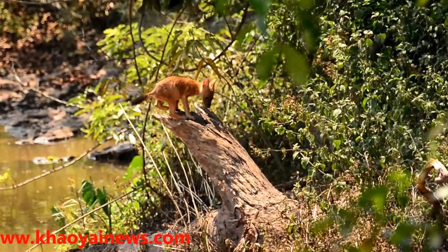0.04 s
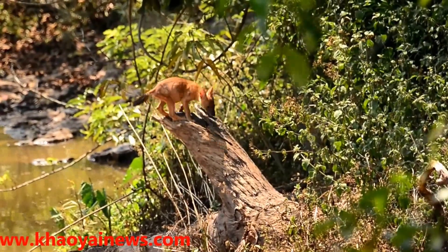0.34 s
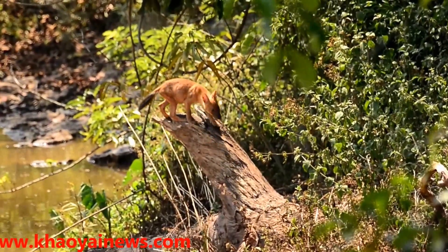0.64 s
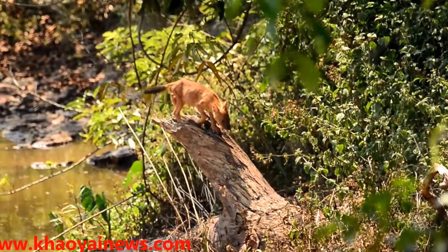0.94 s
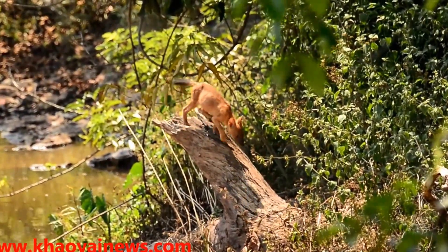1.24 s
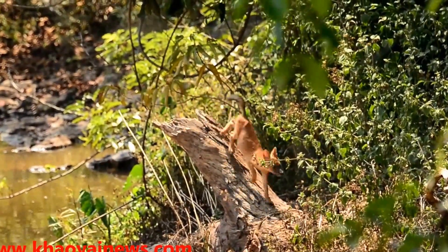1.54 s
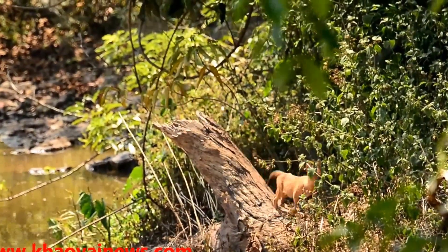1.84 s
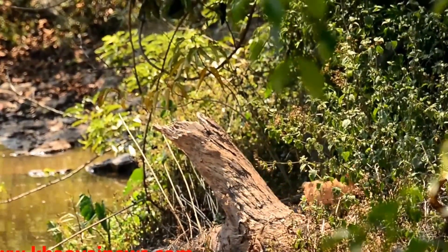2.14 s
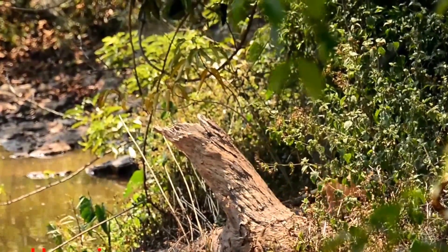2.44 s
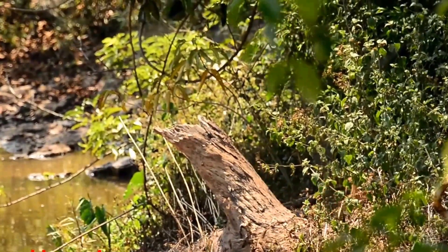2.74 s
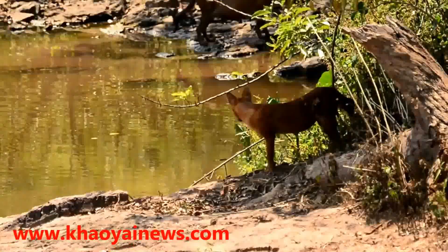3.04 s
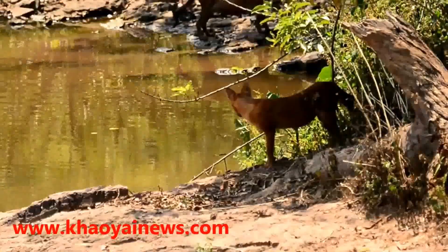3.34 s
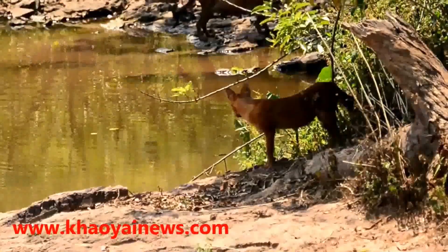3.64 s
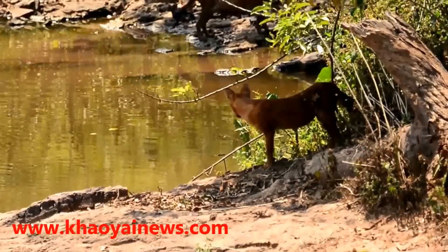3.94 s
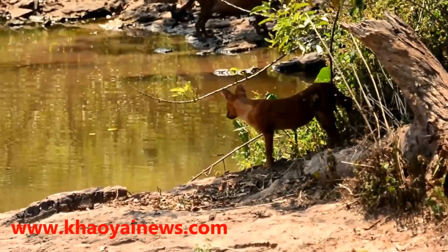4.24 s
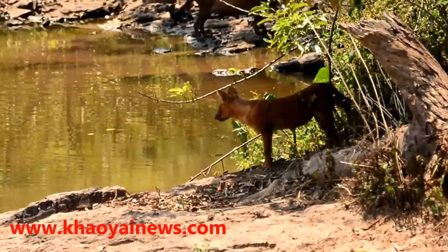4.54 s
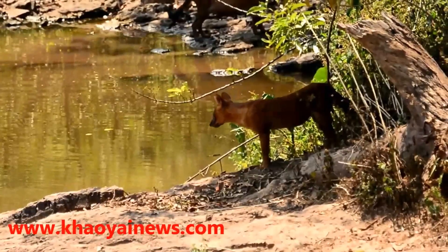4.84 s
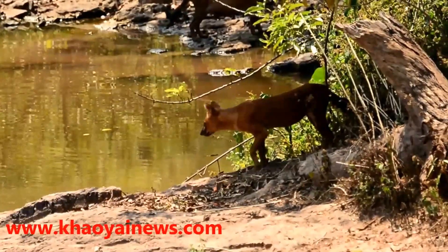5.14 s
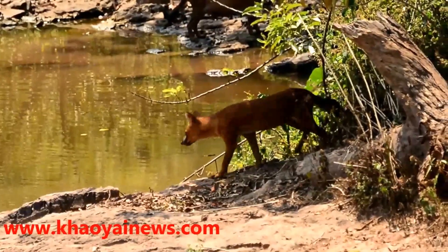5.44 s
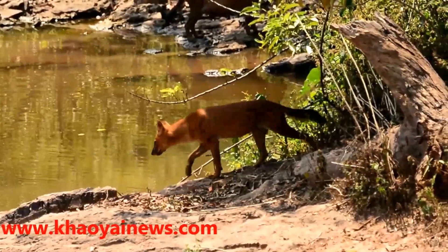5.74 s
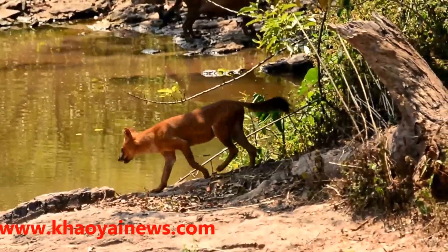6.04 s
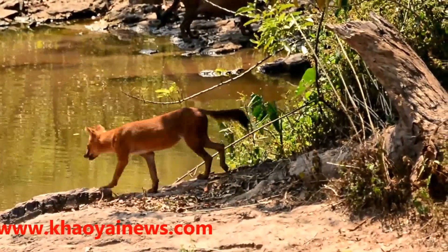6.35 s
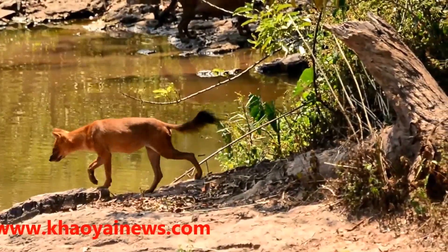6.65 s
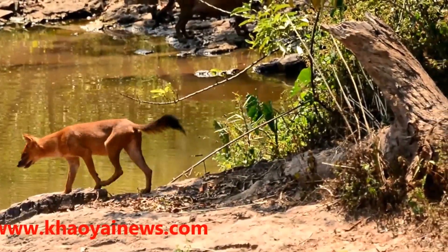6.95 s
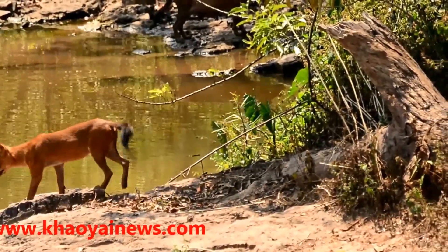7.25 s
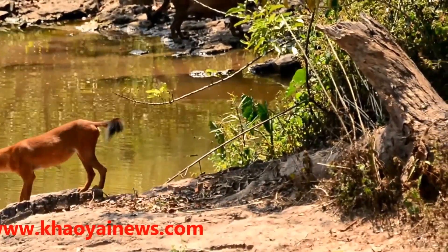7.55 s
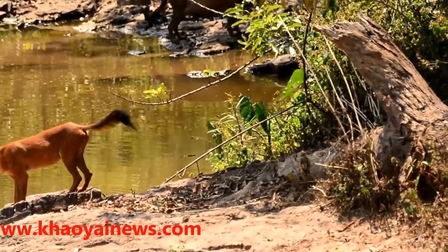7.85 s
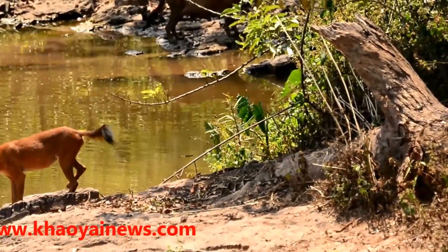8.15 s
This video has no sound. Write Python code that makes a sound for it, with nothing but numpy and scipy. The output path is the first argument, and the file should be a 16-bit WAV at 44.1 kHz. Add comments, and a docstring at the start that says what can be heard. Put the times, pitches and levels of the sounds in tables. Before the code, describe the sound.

Cicadas hiss far off in a forest with thin bird whistles, then swell much louder over a low hum as twigs snap.

```python
"""Cicadas in the heat at a forest waterhole, countless tymbal clicks merging into a hiss, in two shots.
In the first the chorus is far off; a whistling bird and a thin high one sing nearer the microphone,
a warbler calls in the distance and wood is knocked twice. After a cut a much louder chorus fades in
with a low mains hum: twigs snap on the bank, a far bird rasps, and the handled camera rumbles and rings.
A few dull thuds fall close by. Birds, knocks and twigs echo off trunks and leaves."""
import sys
import numpy as np
from scipy import signal
from scipy.fft import rfft, irfft
from scipy.io import wavfile

SR = 44100
rng = np.random.default_rng(int(sys.argv[2]) if len(sys.argv) > 2 else 0)


def master_out(mix):
    """Clip the mix to full scale and print it as 16-bit PCM to the path in sys.argv[1]."""
    frames = np.transpose(np.atleast_2d(mix))
    ceiling = np.clip(frames, -1, 1)
    pcm = np.round(ceiling * 32767).astype(np.int16)
    wavfile.write(sys.argv[1], SR, pcm)


N = 365588
TIME = np.arange(N) / SR
HZ = np.maximum(np.fft.rfftfreq(N, 1 / SR), 1)
CUT_S = 3.059

# arched note of both distant birds: the arguments of contour()
ARCHED_NOTE = dict(top=.55, start=.8, end=0.95, start_db=-2, end_db=-1.5, bend=1.304)


def from_db(db):
    return 10 ** (np.asarray(db) / 20)


def unit_rms(x):
    return x / np.sqrt(np.mean(x ** 2) + 1e-20)


def at_hz(points):
    """A table read on a log-frequency axis."""
    hz, value = np.transpose(points)
    return np.interp(np.log(HZ), np.log(hz), value)


def drift(rate_hz):
    """A random wander with rms 1, mostly slower than rate_hz."""
    return unit_rms(irfft(rfft(rng.standard_normal(N)) / (1 + (HZ / rate_hz) ** 2), N))


def add(track, start_s, sound):
    start = max(round(start_s * SR), 0)
    track[start:start + len(sound)] += sound[:N - start]


def wash(spectrum, likeness):
    """Stereo noise from countless small sources, falling off beyond the ends of its spectrum."""
    mid, side = rfft(rng.standard_normal((2, N)))
    alike = np.clip(at_hz(likeness), -1, 1)
    rolloff = np.minimum(1, np.minimum(HZ / spectrum[0][0], spectrum[-1][0] / HZ)) ** 4
    pair = np.sqrt(1 + alike) * mid + np.sqrt(1 - alike) * side * [[1], [-1]]
    return irfft(pair * rolloff * from_db(at_hz(spectrum)), N) * np.sqrt(SR) / 2


def ring(force, modes, pitch_ratio=1):
    """A force sets each mode of a solid ringing; wider modes die sooner."""
    out = 0
    for k, (hz, width_hz, db) in enumerate(modes):
        decay, angle = np.exp(-np.pi * width_hz / SR), 2 * np.pi * hz * pitch_ratio / SR
        feedback = [1, -2 * decay * np.cos(angle), decay * decay]
        out += (-1) ** k * from_db(db) * signal.lfilter([0, np.sin(angle)], feedback, force + 1e-18)
    return out


def forest(direct, wet_db, t60_s, side):
    """The direct sound plus echoes scattered by trunks and leaves."""
    t = TIME[:SR]
    mid, wide = rng.standard_normal((2, SR)) * from_db(-60 * t / t60_s) * (1 - np.exp(-t / 0.0022))
    echoes = mid + side * wide * [[1], [-1]]
    echoes /= np.sqrt(np.sum(echoes ** 2) / 2)
    return direct + from_db(wet_db) * signal.fftconvolve(direct[None], echoes, axes=1)[:, :N]


def cicadas(spectrum, likeness, swell_db, flutter_db, flutter_hz):
    """So many tymbal clicks overlap that they merge into a hiss, which swells and flutters a little."""
    return wash(spectrum, likeness) * from_db(swell_db * drift(1.8) + flutter_db * drift(flutter_hz))


def forest_air(spectrum, likeness, waver_db, waver_hz):
    """The soft, broad rush of the place, wavering slightly in level."""
    return wash(spectrum, likeness) * from_db(waver_db * drift(waver_hz))


def far_ambience():
    """First shot: the chorus far from the microphone, over quiet forest air."""
    # spectra of the cicadas and the air: frequency_hz, density_db
    chorus_spectrum = [(3900, -95), (4700, -74.0), (5250, -68), (5700, -66.5), (6150, -63), (7000, -66.5),
                       (7900, -69), (8700, -67.5), (9600, -72.2), (10500, -76), (11500, -81.5),
                       (13000, -78.5), (15400, -75.7)]
    air_spectrum = [(25, -103.6), (70, -85), (110, -85.5), (170, -76), (400, -73), (950, -69.5),
                    (1500, -71.5), (2200, -74), (3000, -76.5), (3700, -79), (7000, -81)]
    # likeness of left and right: frequency_hz, correlation
    likeness = [(1000, 0.85), (5000, 0.67), (7500, 0.55), (10000, .1), (15000, -.24)]
    chorus = cicadas(chorus_spectrum, likeness, swell_db=0.46, flutter_db=0.52, flutter_hz=11)
    return chorus + forest_air(air_spectrum, likeness, waver_db=0.45, waver_hz=3.8)


def contour(along, top, start, end, start_db, end_db, bend):
    """A note's pitch ratio and dB follow one effort, both relative to its peak at the fraction `top`."""
    rising = along < top
    distance = np.where(rising, (top - along) / top, (along - top) / (1 - top))
    slack = distance ** bend  # 1 makes a corner, 2 an arch
    return 1 + slack * (np.where(rising, start, end) - 1), slack * np.where(rising, start_db, end_db)


def bird(notes, shape, waver, waver_hz, flutter_db):
    """Each note is a near sine that follows the bird's shape; a fast, deep waver makes it raspy."""
    out = np.zeros(N)
    unsteady = 1 + waver * drift(waver_hz)
    for start_s, length_s, hz, db in notes:
        ratio, shape_db = contour(np.linspace(0, 1, int(length_s * SR)), **shape)
        pitch = hz * ratio * unsteady[int(start_s * SR):][:len(ratio)]
        loudness = from_db(db + shape_db) * signal.windows.tukey(len(ratio), .1)
        add(out, start_s, loudness * np.sin(2 * np.pi * np.cumsum(pitch) / SR))
    return out * from_db(flutter_db * drift(60))


def whistling_bird():
    """A nearby bird gives an upslurred chip, then a nearly level whistle."""
    # notes: start_s, length_s, pitch_hz, level_db
    chip_notes = [(.034, .021, 4280, -29), (1.724, .023, 4270, -27)]
    whistle_notes = [(.165, 0.14, 4213, -25), (1.868, 0.15, 4245, -26), (2.005, 0.044, 4300, -32)]
    # their shapes: the arguments of contour()
    upslur = dict(top=.8, start=0.74, end=0.89, start_db=-12, end_db=-2, bend=.9)
    held = dict(top=0.61, start=0.99, end=1.007, start_db=-18, end_db=-5, bend=2.95)
    chips = bird(chip_notes, upslur, waver=0.013, waver_hz=200, flutter_db=2.0)
    whistles = bird(whistle_notes, held, waver=0.0042, waver_hz=90, flutter_db=2.0)
    return forest(chips + whistles, wet_db=-3.0, t60_s=0.83, side=0.46)


def crack(crumble_s, muffle_hz, crumble=1.0):
    """One sharp break, then a short, bright burst of tearing fibres; soft material muffles it."""
    t = TIME[:SR // 5]
    fibres = rng.standard_normal(len(t)) * np.exp(-t / crumble_s)
    fibres = signal.sosfilt(signal.butter(1, 2000, "high", fs=SR, output="sos"), fibres)
    force = (t == 0) + crumble * fibres / np.linalg.norm(fibres)
    return signal.sosfilt(signal.butter(2, muffle_hz, fs=SR, output="sos"), force)


def thuds():
    """Soft, low contacts close to the microphone, with no ring."""
    # contacts: start_s, rms_db, muffle_hz
    contacts = [(.05, -62, 100), (2.1, -56, 250), (3.216, -50, 600)]
    out = np.zeros(N)
    for start_s, db, hz in contacts:
        add(out, start_s, from_db(db) * unit_rms(crack(crumble_s=0.0067, muffle_hz=hz, crumble=0.88)))
    return out


def high_bird():
    """A nearby bird sings four thin notes, each hooking down in pitch."""
    # notes: start_s, length_s, pitch_hz, level_db
    notes = [(.957, 0.037, 7450, -25), (1.088, 0.03, 7650, -24), (1.221, 0.039, 7400, -26),
             (1.369, 0.032, 7380, -20)]
    # their shape: the arguments of contour()
    hook = dict(top=.4, start=.93, end=.6, start_db=-12, end_db=-4.5, bend=1.6)
    song = bird(notes, hook, waver=0.0086, waver_hz=120, flutter_db=1.5)
    return forest(song, wet_db=1.5, t60_s=0.66, side=0.53)


def warbler():
    """Faint arched notes from far off in the trees."""
    # notes: start_s, length_s, pitch_hz, level_db
    notes = [(1.49, 0.053, 2600, -44), (1.595, 0.11, 2360, -43), (1.755, .05, 2750, -46),
             (3.68, 0.044, 2725, -35.5), (5.21, .03, 2800, -37.5)]
    song = bird(notes, ARCHED_NOTE, waver=0.0073, waver_hz=90, flutter_db=3.5)
    return forest(song, wet_db=-5, t60_s=.3, side=0.73)


def knocks(low_cut_hz):
    """Hollow blows on wood, with the deep bass filtered out by the first shot's low cut."""
    # blows: start_s, level_db, muffle_hz
    blows = [(2.081, -16.5, 1000), (2.721, -4.5, 9000)]
    # modes of the wood: pitch_hz, width_hz, level_db
    wood_modes = [(149, 16, -27.5), (350, 175, -4.5), (600, 260, -5), (1050, 390, -1.5), (1425, 127, -3),
                  (2950, 650, -5.5), (4320, 690, -5.5), (6300, 780, -7)]
    out = np.zeros(N)
    for start_s, db, hz in blows:
        add(out, start_s, from_db(db) * ring(crack(crumble_s=0.0028, muffle_hz=hz), wood_modes))
    out = signal.sosfilt(signal.butter(4, low_cut_hz, "high", fs=SR, output="sos"), out)
    return forest(out, wet_db=-3.5, t60_s=0.16, side=0.23)


def near_ambience(right_db):
    """Second shot: the chorus close and loud, a little to the right, over forest air."""
    # spectra of the cicadas and the air: frequency_hz, density_db
    chorus_spectrum = [(3900, -81), (4500, -70), (4900, -62), (5350, -55), (5950, -55.5), (7250, -54),
                       (7900, -56), (8900, -55), (10250, -60.5), (11200, -72), (13000, -76), (14500, -72.2),
                       (15600, -73.9)]
    air_spectrum = [(20, -83), (45, -66.5), (90, -67), (160, -65), (550, -69), (1000, -70), (1500, -72),
                    (2200, -74), (3300, -74.5), (3900, -74.5), (7000, -81)]
    # likeness of left and right: frequency_hz, correlation
    likeness = [(50, 0.28), (130, 0.053), (300, 0.14), (700, 0.56), (5400, 0.54), (6400, 0.24),
                (7300, 0.32), (8400, .06), (15000, .02)]
    chorus = cicadas(chorus_spectrum, likeness, swell_db=0.19, flutter_db=0.5, flutter_hz=35)
    pan = from_db([[-right_db / 2], [right_db / 2]])
    return chorus * pan + forest_air(air_spectrum, likeness, waver_db=0.24, waver_hz=8.1)


def mains_hum():
    """A steady electric hum: 60 Hz and two of its harmonics."""
    # partials: pitch_hz, level_db
    partials = [(60, -42.5), (120, -47.0), (300, -64)]
    return sum(from_db(db) * np.sqrt(2) * np.sin(2 * np.pi * (hz * TIME + rng.random()))
               for hz, db in partials)


def camera_handling(rumble_db, uneven_db):
    """The camera body rumbles under the hand and rings when bumped."""
    # modes of the body: pitch_hz, width_hz, level_db
    body_modes = [(208.3, 11.5, -8), (260.6, 20.3, 2.5), (403, 26, -4.5)]
    # bumps: start_s, level_db
    bumps = [(7.691, -28.5), (7.916, -28), (8.048, -23.5), (8.148, -21.5), (8.166, -26.0)]
    rubbing = rng.standard_normal(N) * from_db(uneven_db * drift(24))
    jolts = np.zeros(N)
    for start_s, db in bumps:
        add(jolts, start_s, from_db([db]))
    return from_db(rumble_db) * unit_rms(ring(rubbing, body_modes)) + ring(jolts, body_modes)


def fade_in(depth_db, wait_s, rise_s, final_db):
    """Gain after the cut: a short wait at a low level, then an S-shaped rise."""
    risen = np.maximum(TIME - CUT_S - wait_s, 0) / rise_s
    return from_db(final_db) * (1 - (1 - from_db(depth_db)) * np.exp(-risen ** 2))


def twigs():
    """Dry twigs break on the bank; thicker ones ring lower."""
    # snaps: start_s, level_db, pitch_ratio, muffle_hz
    snaps = [(5.869, -15, 0.89, 2200), (5.965, -3.5, 0.8, 1400), (5.991, -8.5, 1, 1700),
             (6.467, -5.5, 0.95, 9000), (6.488, -5.5, 1.14, 3400), (7.613, -5, 1.06, 2700),
             (7.864, -12.5, 0.93, 4000), (7.895, -16, 1.06, 4200), (8.143, -14, 1.05, 4000)]
    # modes of a twig: pitch_hz, width_hz, level_db
    twig_modes = [(1400, 450, -12.0), (1970, 360, -7.5), (2970, 780, -8), (3920, 870, -0.5), (5130, 770, 3)]
    out = np.zeros(N)
    for start_s, db, ratio, hz in snaps:
        add(out, start_s, from_db(db) * ring(crack(crumble_s=0.0039, muffle_hz=hz), twig_modes, ratio))
    return forest(out, wet_db=-2.5, t60_s=0.19, side=0.6)


def raspy_bird():
    """Three distant calls, roughened by a fast, deep waver in pitch."""
    # calls: start_s, length_s, pitch_hz, level_db
    notes = [(6.897, 0.055, 3330, -32.5), (7.2, 0.056, 2760, -39.5), (7.275, 0.061, 2980, -36)]
    calls = bird(notes, ARCHED_NOTE, waver=0.068, waver_hz=400, flutter_db=3.0)
    return forest(calls, wet_db=1.5, t60_s=0.48, side=0.55)


def scene():
    """Two shots of the waterhole, joined by a hard cut and a fade-in."""
    first = far_ambience()
    second = near_ambience(right_db=1.8) + mains_hum() + camera_handling(rumble_db=-39.0, uneven_db=1.0)
    second *= fade_in(depth_db=-17.0, wait_s=0.073, rise_s=0.23, final_db=0.06)
    birds = whistling_bird() + high_bird() + warbler() + raspy_bird()
    return np.where(TIME < CUT_S, first, second) + birds + knocks(low_cut_hz=117) + twigs() + thuds()


def record(dry):
    """The treble is cut steeply above 15850 Hz."""
    return signal.sosfilt(signal.ellip(12, .1, 80, 15850, fs=SR, output="sos"), dry)


dry = scene()
out = record(dry)
master_out(out)
```